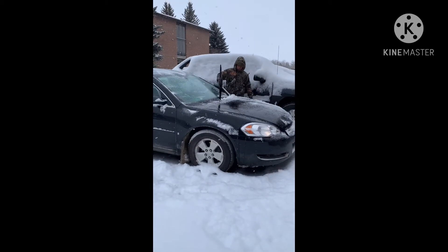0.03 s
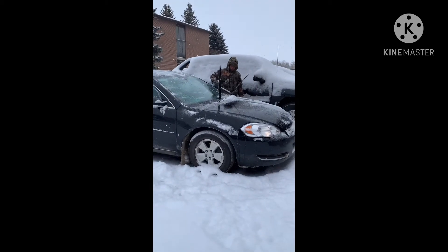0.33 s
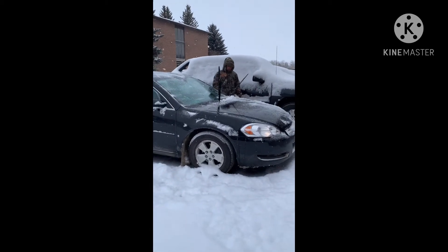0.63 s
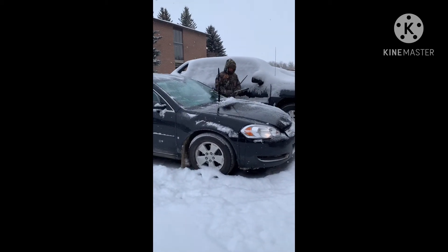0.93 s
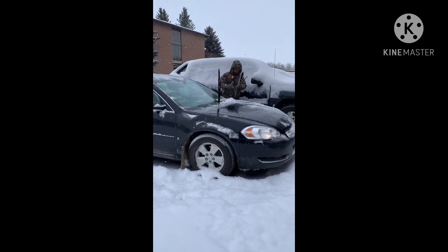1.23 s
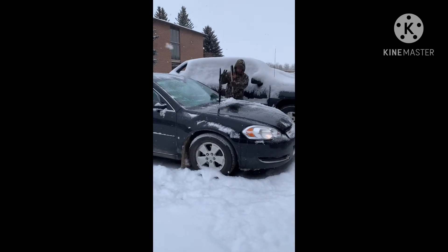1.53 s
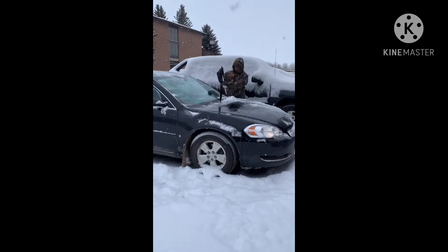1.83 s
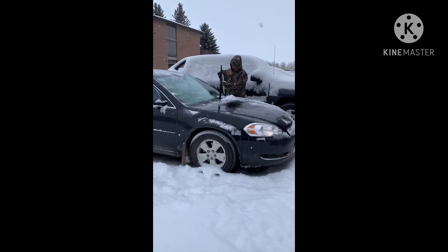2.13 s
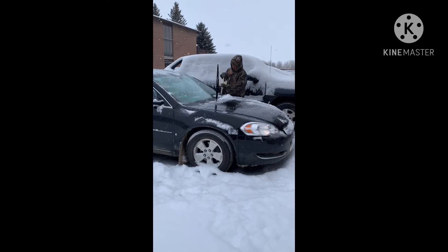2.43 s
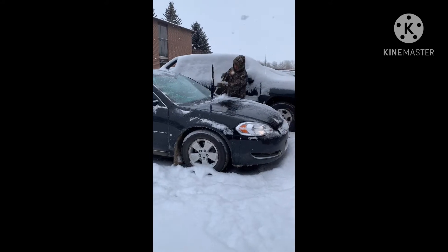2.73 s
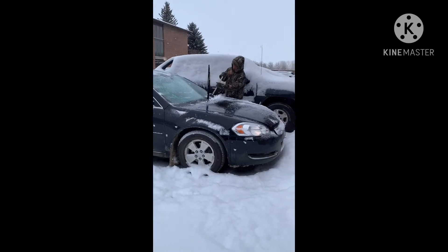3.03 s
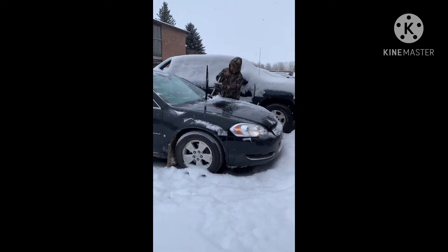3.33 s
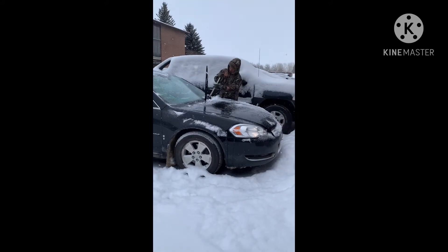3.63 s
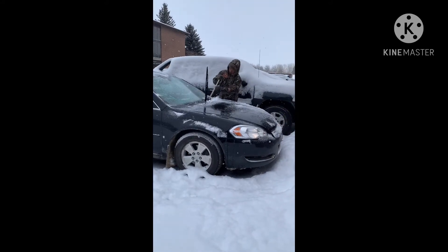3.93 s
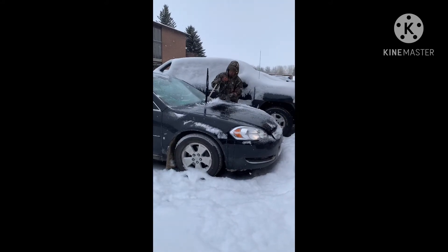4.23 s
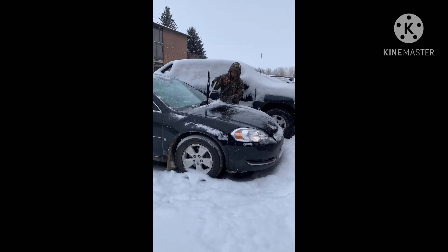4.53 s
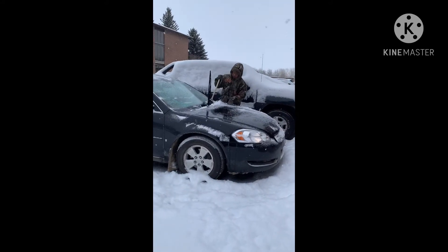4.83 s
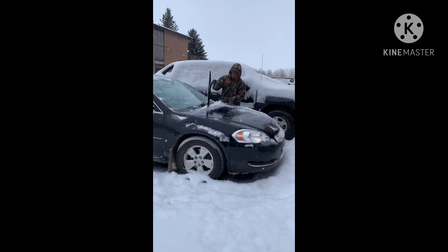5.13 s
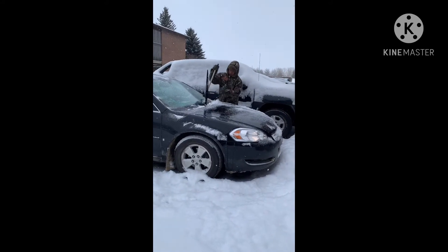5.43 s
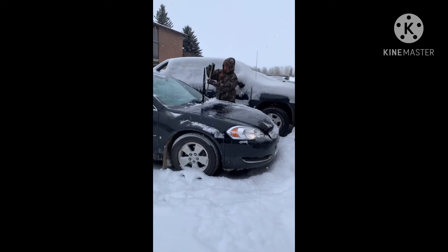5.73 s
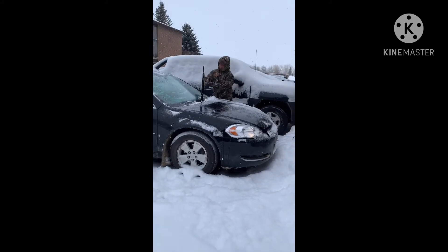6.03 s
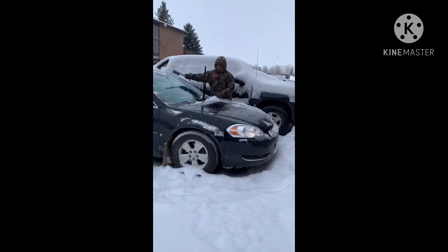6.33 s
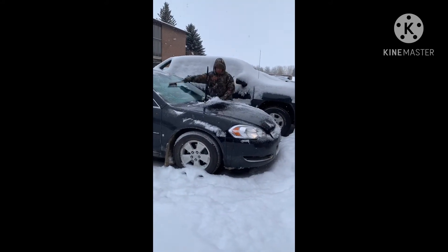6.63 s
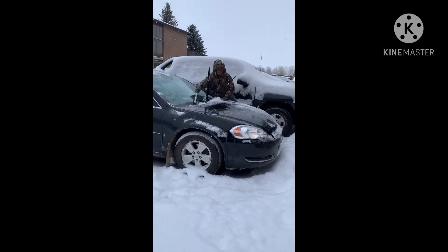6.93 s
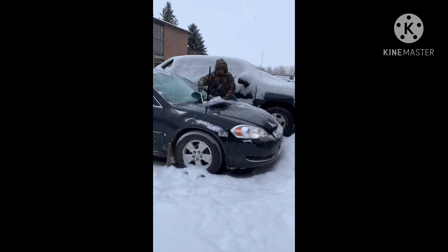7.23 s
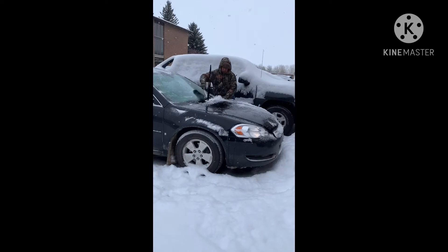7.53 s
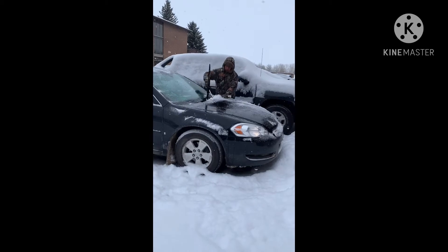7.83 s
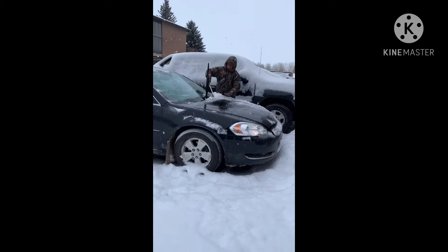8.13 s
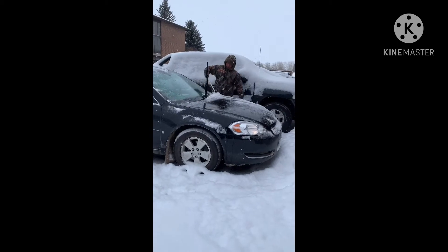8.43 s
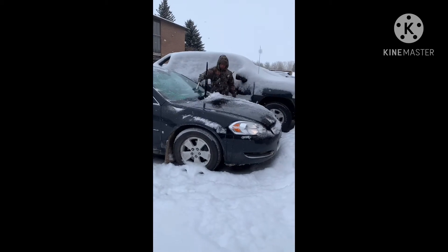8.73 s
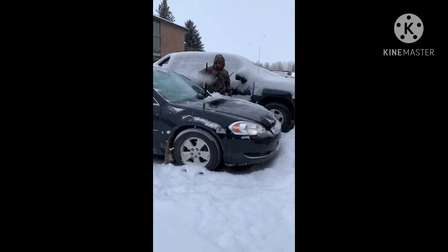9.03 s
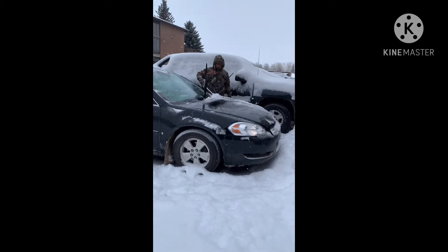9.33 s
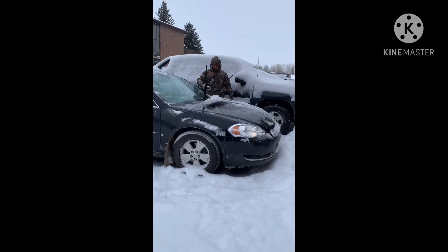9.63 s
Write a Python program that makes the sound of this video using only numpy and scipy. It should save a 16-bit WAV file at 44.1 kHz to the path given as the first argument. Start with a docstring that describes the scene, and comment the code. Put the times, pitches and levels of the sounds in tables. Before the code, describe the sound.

In a snowy parking lot, a hand-held microphone picks up someone clearing a car a few metres off. Soft brush swishes and light knocks come first, then quick, crunchy scrapes on the frosted windscreen with sharp ticks and brief squeaks, then more sweeping. Underneath are a steady low rumble, a thin hiss and the hum of an idling engine, with occasional dull handling thumps.

```python
"""First you hear a low outdoor rumble, an idling engine and a brush sweeping snow off a car.
Soft bumps reach the hand-held microphone, and the long-handled tool knocks and ticks on the car.
Then its blade grates through the frost on the windscreen in quick strokes that ring the glass.
The blade sticks and slips, so it judders and squeaks. After that the brush takes over again.
It all happens a few metres away in a snowy lot, heard through the microphone's two openings."""
import sys
import numpy as np
from scipy import signal
from scipy.fft import rfft, irfft
from scipy.io import wavfile
from scipy.ndimage import uniform_filter1d

SR = 44100
rng = np.random.default_rng(int(sys.argv[2]) if len(sys.argv) > 2 else 0)


def dump_mix(stems):
    """Bounce the given channels to the path in sys.argv[1] as a 16-bit WAV at rate SR."""
    frames = np.atleast_2d(stems).T  # one column per channel
    limited = np.clip(frames, -1, 1)  # hard clip at full scale
    pcm = np.round(limited * 32767).astype(np.int16)
    wavfile.write(sys.argv[1], SR, pcm)


N = 436590
TIME, HZ = np.arange(N) / SR, np.fft.rfftfreq(N, 1 / SR)

# Tone of the outdoor rumble, and of the thin hiss above it: frequency_hz, level_db
AIR_TONE = [(10, -25), (22, 0), (40, -1.5), (70, -2), (110, -6), (170, -12), (300, -15), (440, -22),
            (640, -22.5), (850, -27.5), (1400, -28.5), (2400, -36), (5000, -45.5), (15500, -83)]
HISS_TONE = [(1500, -14), (2900, -2), (3500, 0), (4000, -3), (4800, -6), (5200, -2), (6100, -7), (6550, 2),
             (7200, -9), (7800, -12), (8550, -2), (9300, -9), (10050, -3), (11600, -21), (15500, -22)]
# Drones within the rumble: pitch_hz, width_hz, boost_db
AIR_DRONES = [(351, 8, 6), (394, 5.3, 2.5), (537, 4.9, 7.5), (586, 25, 4), (704, 45, 6.5), (1070, 100, 3.5)]
# How the low rumble gets louder and softer, scaled down in rumble_swell(): time_s, level_db
RUMBLE_LEVEL = [(0.0, -44), (.12, -41.5), (.42, -47), (.62, -41.5), (1.03, -47), (1.3, -41), (1.8, -40.5),
                (2.1, -38.5), (2.53, -45.5), (2.87, -34), (3.47, -44), (4.96, -44.5), (5.4, -41.5),
                (5.93, -45), (6.15, -40.5), (7.2, -47), (7.97, -40), (8.55, -46), (9.35, -40.5),
                (9.9, -45.5)]
# Notes in the engine's hum: cycles_per_shaft_turn, level_db
ENGINE_NOTES = [(2, -48.5), (4, -52), (5, -45.3), (7, -59), (8, -56), (11, -62)]

# In the event tables, level_db sets how strong the events are next to each other.
# Fizz is the highest treble. Fizz, scrub and drone are counted from the row's level_db.
# Sweeps of the brush: start_s, rise_s, hold_s, fade_60db_s, level_db, fizz_db, scrub_db
SWEEPS = [(.05, 0.15, .08, 0.38, -58, -2, -12), (.52, 0.056, 0.046, 0.36, -56, 3, -14),
          (1.2, .1, 0.18, 1.2, -63.5, -11, 4), (1.948, 0.028, 0.018, .45, -49.5, 2.5, -10),
          (3.11, .025, .04, .15, -45.5, 1, 5.5), (4.042, .07, .245, .25, -43.5, 5.5, -4),
          (4.978, 0.027, 0.074, .25, -49, 2, -5), (5.16, 0.026, .01, .25, -55, 2, -12),
          (6.14, .04, .05, .3, -62, -8, -8), (6.38, 0.073, 0.17, .6, -59.5, -9, -11),
          (6.844, 0.016, 0.022, 0.36, -52, 12.5, -12), (6.939, 0.039, 0.034, 0.17, -50.5, 8.5, -8),
          (7.036, 0.13, 0.16, 1.7, -49, 0, -9), (7.15, .08, .17, 1.1, -55, -2, 4.5),
          (7.48, .04, 0.27, 2.1, -55.5, -1, -11), (8.036, 0.056, 0.22, 0.92, -55.5, -5, -8),
          (8.68, 0.088, .02, .15, -53.5, -9, -10), (8.87, 0.041, .02, 0.32, -53, 9, -12),
          (8.983, 0.06, 0.034, 0.88, -51.5, 6, -12), (9.18, .06, 0.067, 0.26, -53.5, -2, -8),
          (9.804, .01, 0.045, .2, -51, 4.5, -3)]
# Tone of bristles in snow, and on bare glass: frequency_hz, level_db
SNOW_TONE = [(150, 0.5), (350, -9), (700, 0.5), (1000, 0), (1500, 3.5), (2400, 3), (3500, 3.5),
             (4700, -2.5), (5500, -.5), (7400, -4.5), (8500, 0), (12000, -6.5), (15500, -5.5)]
SCRUB_TONE = [(500, -13), (850, -6), (1250, 0), (1800, -2.5), (2600, -12), (5000, -29)]
# Soft bumps on the microphone: start_s, level_db, pitch_hz, rise_s
BUMPS = [(1.271, -30, 57.4, 0.016), (1.945, -32, 70, 0.0096), (2.768, -23, 55.3, 0.018),
         (2.882, -18.5, 49.7, 0.015), (2.935, -30, 73, 0.026), (2.993, -17.5, 60.7, 0.0093),
         (3.023, -12, 57, 0.0068), (5.517, -23.5, 71, 0.0093), (7.933, -30, 54.5, 0.0092),
         (7.995, -28, 61, 0.013), (9.383, -26.5, 46, 0.019), (9.807, -27, 50.3, 0.0067),
         (9.87, -23.5, 49, 0.046)]
# The tool and snow clumps knock on the car: start_s, level_db, fade_60db_s, lowest_hz, highest_hz
KNOCKS = [(1.489, -46, .03, 550, 1800), (1.525, -41.5, .022, 550, 2100), (1.563, -49, .04, 550, 1500),
          (1.613, -39.5, .025, 500, 1600), (1.674, -36.5, .021, 550, 2300), (1.714, -41.5, .02, 500, 1500),
          (1.75, -46.5, .03, 550, 1450), (1.821, -38.5, .035, 600, 1700), (1.856, -50, .03, 700, 2800),
          (3.02, -27, .04, 170, 400), (3.097, -30.5, .06, 400, 950), (3.179, -36, .04, 450, 1100),
          (3.776, -30, .05, 280, 800), (4.3605, -28.5, .022, 1600, 3500), (7.512, -47.5, .05, 850, 3400),
          (9.812, -39, .06, 700, 1700), (9.818, -33, .08, 120, 420), (9.837, -44.5, .04, 800, 1600),
          (9.856, -48, .07, 1000, 3000)]
# The tool taps the car or cracks ice: start_s, level_db, fizz_db, fade_60db_s, pitch_hz
TICKS = [(1.911, -40, -11, .05, 3130), (1.979, -41, -5, .045, 920), (2.449, -30, 1, .03, 3180),
         (2.503, -29, -2, .035, 3900), (2.756, -40, -5, .03, 1440), (3.011, -43, -6, .05, 3000),
         (3.031, -44, -6, .04, 3100), (3.055, -38, 11, .02, 2100), (3.404, -33, -1, .03, 2050),
         (3.752, -31, 0, .03, 2900), (3.764, -33, -1, .02, 2750), (3.776, -32, 0, .025, 1200),
         (4.024, -40, 0, .03, 780), (4.057, -47.5, 6, .05, 2680), (4.088, -40, 4, .04, 2080),
         (4.148, -37, 1, .035, 3800), (4.154, -33, 1, .025, 3800), (4.261, -37, -3, .03, 3820),
         (4.288, -35, -8, .02, 2700), (4.421, -45, -9, .025, 2100), (4.449, -46, -7, .025, 3100),
         (4.485, -44, -3, .03, 2700), (4.549, -48.5, -7, .05, 3130), (4.968, -51, 1, .06, 2630),
         (5.0135, -32, -1, .045, 1100), (5.023, -36, -3, .035, 570), (5.083, -47, -9, .04, 1500),
         (8.765, -54, 3, .06, 3000), (9.599, -42.5, 1, .02, 2000), (9.809, -40, 8, .04, 1400)]
# Tone of a tick's crack: frequency_hz, level_db
CRACK_TONE = [(120, 41), (300, 19), (600, 27.7), (1300, 6.6), (2200, 12), (4000, 7.1), (6500, 6.6),
              (10000, 7.1), (15500, 2)]
# Pushes of the blade: start_s, rise_s, hold_s, fade_60db_s, level_db, fizz_db, drone_db
STROKES = [(2.215, .03, .01, .1, -49, 2, -8), (2.25, .02, .025, .16, -43, 2, -6),
           (2.312, .02, .035, 0.24, -45, 0.5, 0.5), (2.394, 0.035, .04, .2, -42.5, -1.5, -2),
           (2.455, 0.043, 0.014, 0.43, -33, 0, -10.5), (2.555, 0.013, .01, 0.36, -40, -4, -14),
           (2.706, 0.013, .01, 1, -55, -4, -4), (2.998, .01, 0.035, 0.045, -48.5, -10, 4),
           (3.052, .003, .01, .06, -41, 7, -8), (3.066, .016, .012, .06, -33.5, 1, -9),
           (3.088, 0.0092, .008, .1, -40, -6, 6), (3.118, .01, .03, .2, -39.5, -3, 3),
           (3.379, 0.019, .005, .06, -44.5, 0, -4), (3.401, 0.004, 0.012, 0.066, -33, 1.5, -5),
           (3.428, 0.005, 0.029, 0.13, -32.5, 1, -1), (3.472, .005, 0.014, .06, -40.5, -5, 3),
           (3.501, .01, .05, .2, -47, -6, -3.5), (3.564, 0.019, .025, 0.21, -42.5, -8, -14),
           (3.733, .004, .01, .05, -45.5, -7, -8), (3.75, .006, 0.029, .085, -35.5, 2, 1.5),
           (3.783, .01, 0.035, 0.18, -48, -3.5, 4), (3.903, 0.017, .005, 0.18, -52, -5, -10),
           (4.022, .008, .045, .1, -51, -7, 5.5), (4.035, .055, .26, .36, -43, -3, -.5),
           (4.406, .015, .03, .2, -54.5, -7, 2), (4.467, 0.017, 0.0074, 0.12, -46.5, -5, -5)]
# Tone of breaking frost: frequency_hz, level_db
FROST_TONE = [(90, -42), (185, -19), (270, -7), (430, -10), (700, -9), (1400, -13), (2200, -12),
              (3200, -13), (5000, -14), (7200, -18), (8400, -13), (11000, -17), (15500, -26)]
# Notes at which the windscreen and the tool ring: pitch_hz, width_hz, boost_db
GLASS_NOTES = [(250.4, 44, 12.5), (624, 48, 5), (984, 25, 2), (1630, 40, 3), (2030, 95, 9), (2190, 37, 6.5),
               (2695, 110, 5.5), (2930, 150, 4.5), (3830, 330, 5), (5260, 130, 6.5), (5720, 130, 7.5),
               (6510, 180, 5.5), (8180, 360, 5)]
# The blade judders over the glass: start_s, length_s, level_db, slips_per_s
JUDDERS = [(2.265, 0.022, -36, 283), (2.288, 0.038, -36, 280), (2.346, 0.054, -39, 280),
           (3.757, 0.045, -36, 230)]
# The blade catches and sings: start_s, length_s, level_db, pitch_hz, roughness_0_to_1
SQUEAKS = [(2.475, 0.047, -37, 1800, .7), (2.49, 0.076, -34.5, 610, 0.1), (2.485, .08, -33.5, 4000, .9),
           (2.565, .12, -43, 2080, 0.7), (3.054, .02, -28, 2080, .15), (3.072, .014, -25.5, 2120, .4),
           (3.085, .017, -24, 2130, .6), (3.084, .018, -33, 2850, .6), (3.08, 0.039, -33, 980, 0.45),
           (3.127, .015, -31.5, 2050, .4), (3.143, .012, -35, 2100, .3), (3.066, .045, -31.5, 8250, .9),
           (3.12, 0.048, -36, 8300, .9), (3.404, 0.018, -29, 2040, 0.3), (3.43, 0.015, -26.5, 2040, 0.3),
           (3.432, 0.048, -32, 5700, .8), (3.44, .05, -34.5, 640, .4), (3.754, .024, -27.5, 2740, 0.65),
           (3.753, .048, -30.5, 8400, .9)]

# How far the microphone's left opening is ahead of the right: frequency_hz, lead_radians
LEFT_LEAD = [(0, 0), (150, -.1), (450, -.6), (1000, -.15), (1750, 0), (2700, 1.25), (3500, 1.25),
             (4200, 2.2), (4850, 3.14), (5300, 3.7), (6400, 5.9), (9100, 9.42), (13250, 15.7),
             (16000, 19.6)]
# How alike the two openings sound: frequency_hz, likeness_0_to_1
LIKENESS = [(50, .96), (300, .96), (700, .93), (1500, .98), (2500, .87), (3800, .87), (4700, .99),
            (15000, .985)]


def amp(db):
    """Turns decibels into a number to multiply by."""
    return 10 ** (np.asarray(db) / 20)


def unit(x):
    """Scales a signal to an average strength (rms) of 1."""
    return x / np.sqrt(np.mean(x ** 2) + 1e-20)


def curve(points):
    """Joins a table's points into a line over all frequencies, on a log scale."""
    hz, value = np.transpose(points)
    return np.interp(np.log(HZ + 1), np.log(hz + 1), value)


def add(mix, start_s, sound):
    """Mixes a sound in at a given time."""
    part = mix[round(start_s * SR):][:len(sound)]
    part += sound[:len(part)]


def wander(rate_hz):
    """A random wobble, mostly slower than rate_hz."""
    return unit(irfft(rfft(rng.standard_normal(N)) / (1 + (HZ / rate_hz) ** 4), N))


def colour(x, tone):
    """Makes each frequency louder or softer, following a tone table."""
    return irfft(rfft(x) * amp(curve(tone)), N)


def ring(x, notes):
    """Lets a sound ring on at a set of notes."""
    response = sum((amp(db) - 1) / (1 + 2j * (HZ - hz) / width) for hz, width, db in notes)
    return irfft(rfft(x) * (1 + response), N)


def three_bands(x, low_hz=900, high_hz=5000):
    """Splits a sound into equally strong low, middle and high parts."""
    low = 1 / (1 + (HZ / low_hz) ** 8)
    high = 1 - 1 / (1 + (HZ / high_hz) ** 8)
    spectrum = rfft(x)
    return [unit(irfft(spectrum * share, N)) for share in (low, 1 - low - high, high)]


def shimmer(x, depth_db, bins, frames):
    """Narrow peaks come and go, as when a contact point moves; each is bins wide and frames long."""
    slices = signal.stft(x, nperseg=1024, noverlap=768)[2]
    patches = uniform_filter1d(rng.standard_normal(slices.shape[1:]), bins, axis=0)
    patches = unit(uniform_filter1d(patches, frames, axis=1))
    gain = amp(depth_db * np.clip(patches, -2, 2))
    return signal.istft(slices * gain, nperseg=1024, noverlap=768)[1][:, :N]


def grains(per_s, spread_db):
    """Tiny cracks, a few of them large, in two rows with the same timing: direct and scattered."""
    size = amp(spread_db * np.minimum(rng.exponential(1, N), 3))
    happens = rng.random(N) < per_s / SR
    return unit(size * happens * rng.choice([-1, 1], (2, N)))


def push(rise_s, hold_s, fade_s):
    """The force of one arm movement: it presses in, holds, and lets go."""
    t = np.arange(0, rise_s + hold_s + fade_s, 1 / SR)
    return np.minimum(t / rise_s, 1) * amp(-60 * np.maximum(t - rise_s - hold_s, 0) / fade_s)


def rumble_swell(depth):
    """The low rumble gets louder and softer around its average."""
    db = np.interp(TIME, *np.transpose(RUMBLE_LEVEL))
    return amp(depth * (db - db.mean()))


def outdoors(air_db=-43.5, hiss_db=-59, bass_hz=170):
    """Wind and distant traffic rumble under a thin hiss; the bass gets louder and softer."""
    air = unit(ring(colour(rng.standard_normal((2, N)), AIR_TONE), AIR_DRONES))
    bass = irfft(rfft(air) / (1 + (HZ / bass_hz) ** 4), N)
    air += (rumble_swell(depth=0.63) - 1) * bass
    hiss = shimmer(colour(rng.standard_normal((2, N)), HISS_TONE), depth_db=3.5, bins=3, frames=24)
    return amp(air_db) * air + amp(hiss_db) * unit(hiss)


def engine(shaft_hz=16.35, waver=0.014, throb_db=2.6, flutter_db=1.5):
    """An idling engine: low notes follow the shaft's wavering speed, throbbing and fluttering."""
    turns = np.cumsum(shaft_hz * (1 + waver * wander(4))) / SR
    hum = np.zeros(N)
    for cycles, db in ENGINE_NOTES:
        throb = amp(throb_db * wander(3.1) + flutter_db * wander(9))
        hum += amp(db) * unit(throb * np.sin(2 * np.pi * cycles * turns))
    return hum * rumble_swell(depth=0.48)  # the hum swells and sinks with the rumble


def brush(trim_db=-5, body_db=-4, flutter_db=1.57, rustle_db=-67, rustle_fizz_db=-7):
    """Many bristles push soft snow and scrub the glass beneath, making fine, dense grains."""
    swish_power = np.full(N, amp(rustle_db) ** 2)  # a faint rustle stays between sweeps
    powder_power = np.full(N, amp(rustle_db + rustle_fizz_db) ** 2)
    scrub_power = np.zeros(N)
    for start, rise, hold, fade, db, fizz_db, scrub_db in SWEEPS:
        force = amp(db) * push(rise, hold, fade)
        add(swish_power, start, force ** 2)
        add(powder_power, start, (force * amp(fizz_db)) ** 2)
        add(scrub_power, start, (force * amp(scrub_db)) ** 2)
    bristles = grains(per_s=8000, spread_db=2) * amp(flutter_db * wander(26))
    bristles = shimmer(bristles, depth_db=3.5, bins=4, frames=14)
    low, mid, high = three_bands(colour(bristles, SNOW_TONE))
    swish = np.sqrt(swish_power) * (mid + amp(body_db) * low)
    powder = np.sqrt(powder_power) * high
    scrub = np.sqrt(scrub_power) * unit(colour(grains(per_s=1500, spread_db=1.5), SCRUB_TONE))
    return amp(trim_db) * (swish + powder + scrub)


def bumps(trim_db=-1, overtone_ratio=2.133, overtone_db=-8):
    """Each bump on the microphone is a low push of a few cycles, with a quicker overtone."""
    out, t = np.zeros(N), TIME[:SR // 5]
    for start, db, hz, rise in BUMPS:
        swell = (t / rise * np.exp(1 - t / rise)) ** 2
        angle = 2 * np.pi * hz * t
        thud = np.sin(angle) + amp(overtone_db) * np.sin(overtone_ratio * angle)
        add(out, start, amp(db + trim_db) * swell * thud)
    return out


def knocks():
    """The tool and clumps of snow hit the car: short, dull bursts of noise with no crack on top."""
    out, t = np.zeros(N), TIME[:SR // 5]
    for start, db, fade_s, low_hz, high_hz in KNOCKS:
        band = signal.butter(3, [low_hz, high_hz], "bandpass", fs=SR, output="sos")
        fade = amp(-60 * t / fade_s)
        burst = signal.sosfilt(band, fade * rng.standard_normal(len(t)))
        add(out, start, amp(db) * np.sqrt(np.mean(fade ** 2)) * unit(burst))
    return out


def ticks(trim_db=1, body_db=-5, note_db=-4, rise_s=.0003):
    """The tool taps the car or cracks ice: a sharp crack, and the struck spot rings briefly."""
    low, mid, high = three_bands(colour(rng.standard_normal((2, N)), CRACK_TONE))
    out = np.zeros((2, N))
    for start, db, fizz_db, fade_s, hz in TICKS:
        at = slice(round(start * SR), round(start * SR) + SR // 5)
        t = TIME[at] - TIME[at][0]
        crack = mid[:, at] + amp(body_db) * low[:, at] + amp(fizz_db) * high[:, at]
        note = amp(note_db) * np.sin(2 * np.pi * hz * t)
        loudness = amp(db + trim_db - 60 * t / fade_s) * (1 - np.exp(-t / rise_s))
        out[:, at] += loudness * (crack + note)
    return out


def scraper(drone_trim_db=-1, drone_lag_s=0.0079, sag_db_per_s=15, slip_db=2.5, slip_hz=110, rub=0.33):
    """The blade sticks and slips, breaking frost in clumps of grains that ring the glass."""
    power = np.zeros((3, N))  # low drone of the glass, grating, fizz of ice chips
    for start, rise, hold, fade, db, fizz_db, drone_db in STROKES:
        shape = push(rise, hold, fade)
        sag_db = sag_db_per_s * np.maximum(TIME[:len(shape)] - rise, 0)  # a push weakens as it runs on
        force = shape * amp(db - sag_db)
        # The glass builds up its drone just after the blade bites.
        add(power[0], start + drone_lag_s, (force * amp(drone_db + drone_trim_db)) ** 2)
        add(power[1], start, force ** 2)
        add(power[2], start, (force * amp(fizz_db)) ** 2)
    slips = amp(slip_db * np.clip(wander(slip_hz), -2, 1.4))
    crunch = (grains(per_s=3600, spread_db=2.6) + rub * rng.standard_normal((2, N))) * slips
    crunch = shimmer(crunch, depth_db=4.2, bins=4, frames=11)
    bands = three_bands(ring(colour(crunch, FROST_TONE), GLASS_NOTES))
    return sum(gain * band for gain, band in zip(np.sqrt(power), bands))


def judder(jitter=0.055, overtone_db=-15):
    """Nearly regular slips of the blade make a short, low buzz that swells and fades."""
    out, drift = np.zeros(N), wander(70)
    for start, length, db, slips_per_s in JUDDERS:
        swell = np.hanning(round(length * SR))
        pitch_hz = slips_per_s * (1 + jitter * drift[round(start * SR):][:len(swell)])
        angle = 2 * np.pi * np.cumsum(pitch_hz) / SR
        buzz = np.sin(angle) + amp(overtone_db) * (np.sin(2 * angle) + np.sin(3 * angle))
        add(out, start, amp(db) * swell * unit(buzz))
    return out


def squeaks(waver=0.015, grit_hz=130, skew=0.55, sag=0.052):
    """The blade's edge sings as it bites, clean or hoarse, and its pitch sags as it lets go."""
    out, drift = np.zeros(N), wander(150)
    grit_size = unit(abs(wander(grit_hz) + 1j * wander(grit_hz)))
    grit = grit_size * np.exp(2j * wander(grit_hz))  # shakes both the loudness and the wave's timing
    for start, length, db, hz, rough in SQUEAKS:
        at = slice(round(start * SR), round((start + length) * SR))
        progress = np.linspace(0, 1, len(drift[at])) ** skew  # quick at first, so the swell peaks early
        swell = np.sin(np.pi * progress) ** 2
        pitch_hz = hz * (1 + waver * drift[at] + sag * (.5 - progress))
        note = np.exp(2j * np.pi * np.cumsum(pitch_hz) / SR)
        hoarseness = np.sqrt(1 - rough ** 2) + rough * grit[at]
        add(out, start, amp(db) * swell * (hoarseness * note).real)
    return out


def microphone(direct, scattered):
    """Direct sound reaches one opening a little early; scattered sound differs between the two."""
    likeness = curve(LIKENESS)
    shared = rfft(direct) * np.sqrt((1 + likeness) / 2)
    apart = rfft(scattered) * np.sqrt((1 - likeness) / 2)
    lag = np.exp(-1j * np.interp(HZ, *np.transpose(LEFT_LEAD)))
    return irfft(np.array([shared + apart, (shared - apart) * lag]), N)


def scene():
    """The lot and the work on the car, as the microphone picks them up."""
    direct, scattered = outdoors() + brush() + ticks() + scraper()
    direct += engine() + bumps() + knocks() + judder() + squeaks()
    return microphone(direct, scattered)


def record(dry):
    """Cuts off the very highest treble steeply."""
    treble_cut = signal.firwin(511, cutoff=15760, window=("kaiser", 9), fs=SR)
    return signal.oaconvolve(dry, treble_cut[None], "same")


dry = scene()
out = record(dry)
dump_mix(out)
```